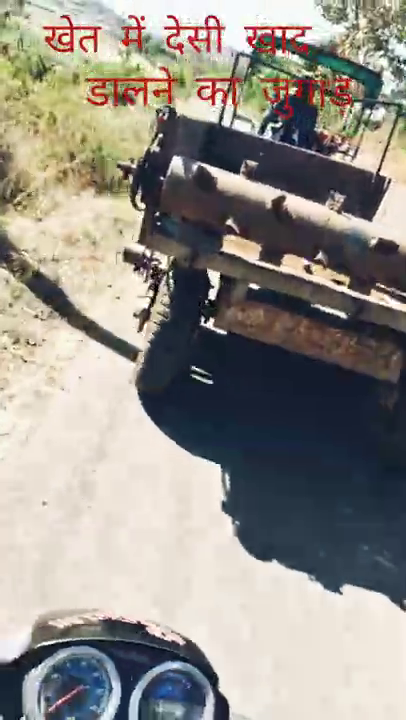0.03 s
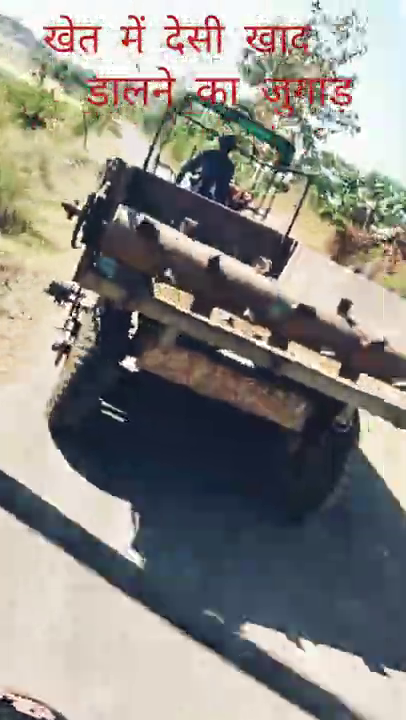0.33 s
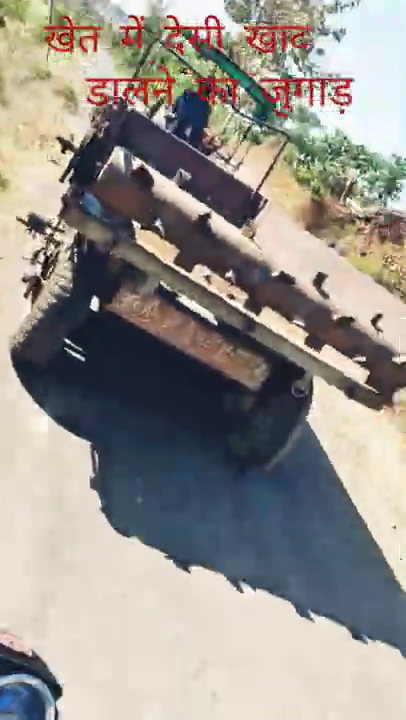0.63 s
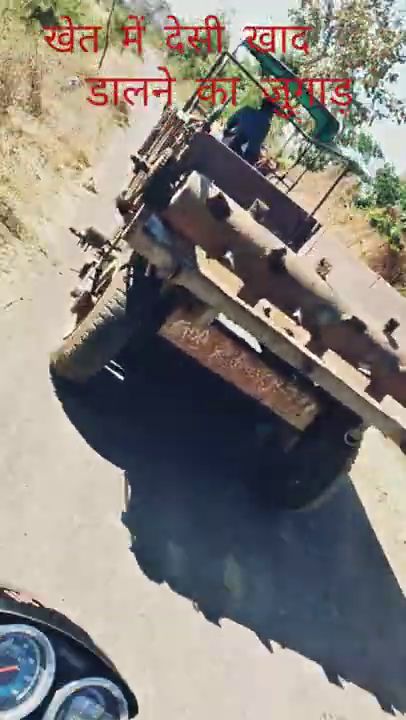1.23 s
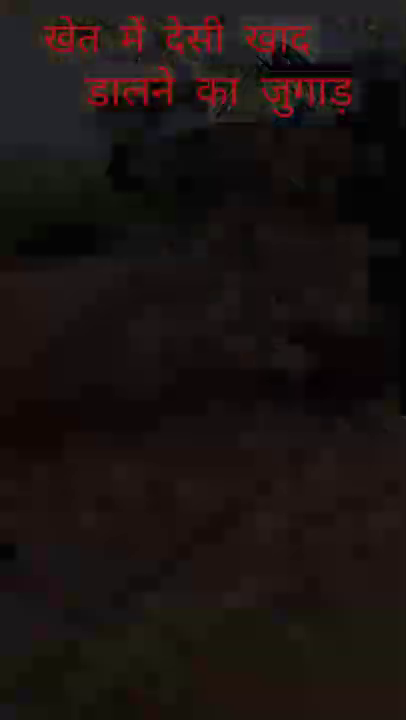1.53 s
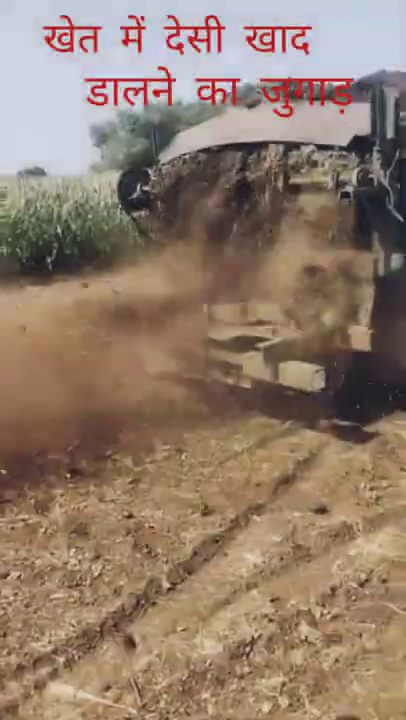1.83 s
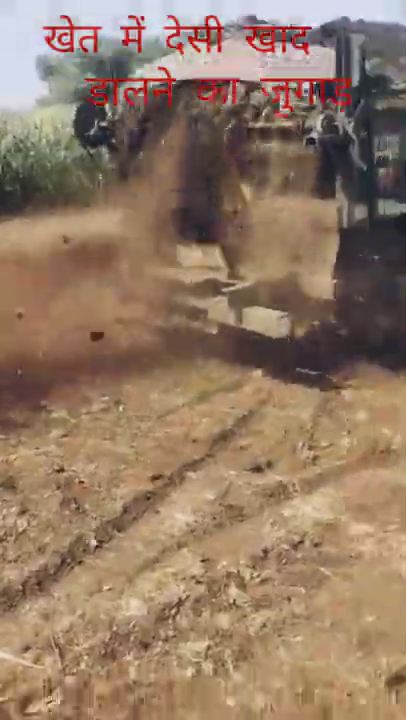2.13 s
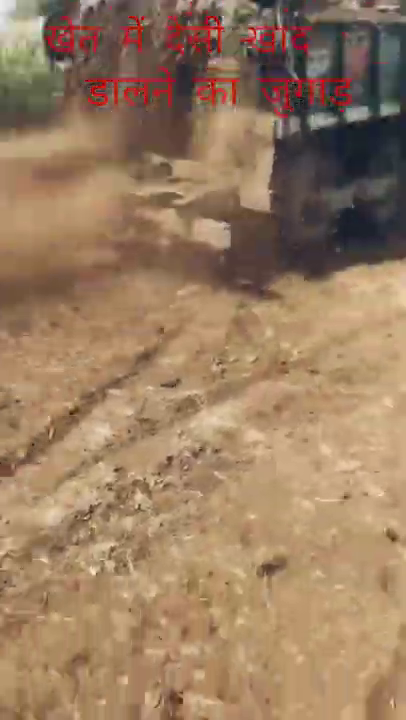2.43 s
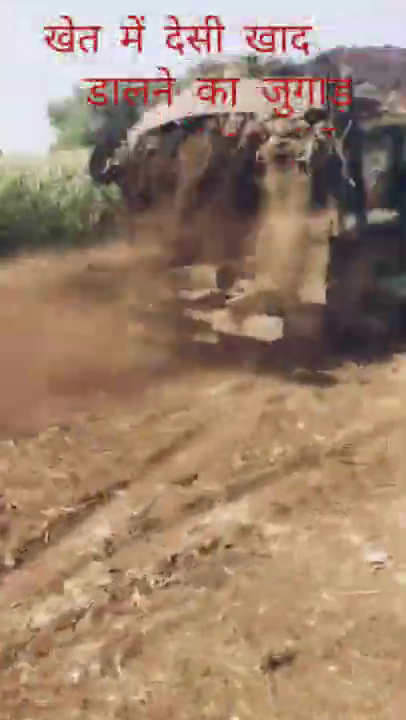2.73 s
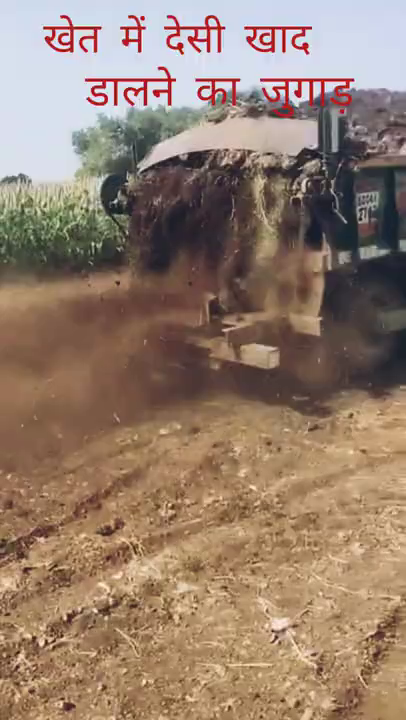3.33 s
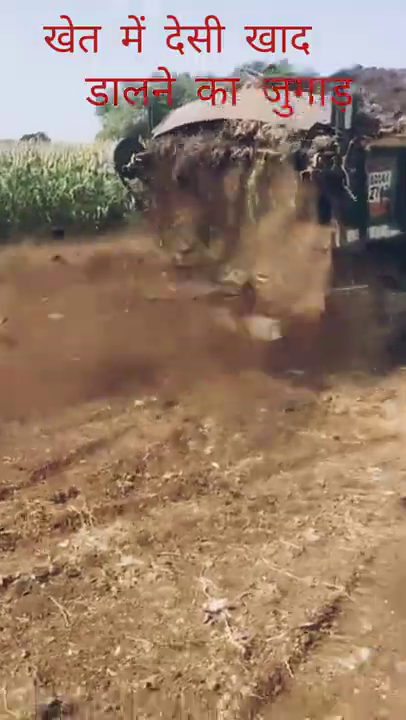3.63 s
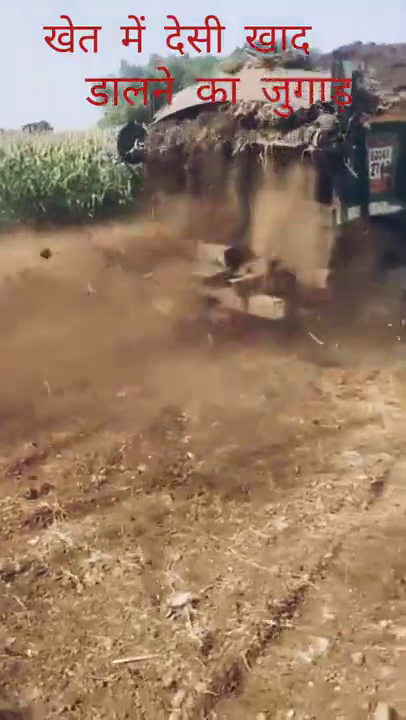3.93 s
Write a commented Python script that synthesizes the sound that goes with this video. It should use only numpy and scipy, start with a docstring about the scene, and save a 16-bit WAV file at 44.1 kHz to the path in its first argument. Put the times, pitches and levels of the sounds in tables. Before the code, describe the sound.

A manure spreader's clatter is the main sound. First, wind buffets the microphone over a motorcycle's engine beat and faint trailer rattles, fading out by 1.5 seconds. The spreader then fades in: dry clods thud and crunch irregularly on spinning steel discs, with hissing sprays of grit over a tractor's drone until 4 seconds. Stones ring against the steel at about 2.8 and 3.4 seconds.

```python
"""Wind buffets the microphone over an engine beat and faint rattles: a motorcycle follows a tractor's
manure spreader along a road. That fades out, and the spreader fades in at work in a field.
Clods drop on its spinning steel discs and burst, dry grit sprays out,
and a few stones ring the vanes over the drone of the tractor."""
import sys
import numpy as np
from scipy import signal
from scipy.fft import rfft, irfft
from scipy.io import wavfile

SR = 44100
rng = np.random.default_rng(int(sys.argv[2]) if len(sys.argv) > 2 else 0)


def generate_wav(sig):
    """Save sig (samples, or channels by samples) to the path in sys.argv[1] as 16-bit PCM at SR."""
    pcm = np.round(np.clip(np.atleast_2d(sig).T, -1, 1) * 32767).astype(np.int16)
    wavfile.write(sys.argv[1], SR, pcm)


N = 176400
T = np.arange(N) / SR


def amp(db):
    """Decibels to gain."""
    return 10 ** (np.asarray(db) / 20)

def unit(x):
    """Scales to rms 1."""
    return x / np.sqrt(np.mean(x ** 2) + 1e-20)

def curve(points):
    """Breakpoints to one value per sample."""
    return np.interp(T, *np.transpose(points))

def at_hz(points, hz):
    """Table lookup on a log-frequency axis."""
    f, value = np.transpose(points)
    return np.interp(np.log(hz + 1), np.log(f + 1), value)

def colour(x, spectrum, size=8192):
    """Minimum-phase filter; keeps the power of white noise."""
    log_gain = np.log(amp(at_hz(spectrum, abs(np.fft.fftfreq(size, 1 / SR)))))
    taps = np.fft.ifft(np.exp(np.conj(signal.hilbert(log_gain)))).real[:size // 2]
    return signal.oaconvolve(x, taps / np.linalg.norm(taps))[:N]

def resonate(x, hz, width_hz):
    """One complex resonance; its real part keeps the power of white noise."""
    r = np.exp(-np.pi * width_hz / SR)
    pole = r * np.exp(2j * np.pi * hz / SR)
    return signal.lfilter([np.sqrt(2 * (1 - r * r))], [1, -pole], x + 1e-18)

def wander(rate_hz):
    """Random drift of rms 1, up to about rate_hz."""
    hz = np.fft.rfftfreq(N, 1 / SR)
    return unit(irfft(rfft(rng.standard_normal(N)) * (hz > 2) / (1 + (hz / rate_hz) ** 4), N))

def grains(spread_db):
    """Dense stream of tiny, uneven impacts."""
    return unit(rng.standard_normal(N) * amp(spread_db * np.clip(wander(830), -2.5, 2.5)))

def bursts(rows, attack_s=0.0011, release_s=0.011):
    """Power sum of attack-hold-release envelopes."""
    power = np.zeros(N)
    for start_s, hold_s, db in rows:
        t = np.maximum(T - start_s, 0)
        release = np.exp(-np.maximum(t - hold_s, 0) / release_s)
        power += (amp(db) * np.minimum(t / attack_s, 1) * release) ** 2
    return np.sqrt(power)


# Left-right likeness: f/Hz, coherence/1
COHERENCE = [(60, 0.4), (200, 0.83), (1000, 0.17)]

def stereo_noise(spectrum):
    """Partly alike noise at two microphones."""
    same = at_hz(COHERENCE, np.fft.rfftfreq(N, 1 / SR))
    mid, side = rfft(rng.standard_normal((2, N))) * np.sqrt([(1 + same) / 2, (1 - same) / 2])
    return np.array([colour(irfft(mid + sign * side, N), spectrum) for sign in (1, -1)])

# Wind rumble: f/Hz, gain/dB
WIND_SPECTRUM = [(12, -40), (20, -1), (43, -3.5), (107, -3.5), (151, -1.5), (252, -10.5), (307, -13),
                 (600, -28), (780, -52), (1320, -120)]
# One stronger gust: t/s, level/dB
WIND_LEVEL = [(.96, -27.5), (1.0, -21.5), (1.11, -24.5), (1.15, -25.5)]

def wind(gust):
    """Gusts buffet the microphone."""
    return amp(curve(WIND_LEVEL)) * unit(stereo_noise(WIND_SPECTRUM) * amp(2.5 * gust))

# Road noise: f/Hz, gain/dB
ROAD_SPECTRUM = [(300, -13.5), (450, -2), (540, -7.5), (830, -3), (1450, -14.5), (2100, -13.5), (2900, -27),
                 (4200, -34), (6100, -37), (7100, -34), (8500, -42), (10500, -44), (13000, -62)]
FIRING_HZ = 21.66

def road(gust, level_db=-37.5, gust_db=2.4, jolt_db=1.5):
    """Road noise throbs with the engine, sways with gusts and shakes as the trailer jolts."""
    throb = 1 + 0.088 * np.cos(2 * np.pi * FIRING_HZ * T)
    noise = stereo_noise(ROAD_SPECTRUM) * throb
    return amp(level_db) * unit(noise * amp(gust_db * gust + jolt_db * wander(55)))

# Exhaust harmonics: f/FIRING_HZ, level/dB
EXHAUST_HARMONICS = [(2, -32.5), (4, -39), (7, -36.5), (14, -49.5), (18, -47)]

def exhaust(drift_db=1.7, drift_rad=0.98):
    """Harmonics of the firing rate, drifting in level and phase."""
    out = np.zeros(N)
    for order, db in EXHAUST_HARMONICS:
        gain = amp(drift_db * wander(7.1))
        phase = 2 * np.pi * order * FIRING_HZ * T + drift_rad * wander(6.1)
        out += amp(db) * unit(gain * np.sin(phase))
    return out

# Trailer rattles, ticks: t/s, hold/s, level/dB
RATTLES = [(.497, 0.0036, -40), (.548, 0.025, -39.5), (.607, 0.021, -38.5), (1.309, 0.006, -44)]
TICKS = [(.735, .002, -53.5), (.853, 0.0023, -50), (1.213, .002, -49.5), (1.326, .002, -50.5)]
# Their spectra: f/Hz, gain/dB
RATTLE_SPECTRUM = [(300, -32), (1000, 7), (2100, 4.5), (2900, -15), (4200, -19), (16000, -50)]
TICK_SPECTRUM = [(1000, -27), (3700, -2), (4200, 7), (4800, -9), (15000, -18)]

def trailer():
    """The trailer rattles faintly, with small sharp ticks."""
    rattles = colour(bursts(RATTLES) * grains(spread_db=4.5), RATTLE_SPECTRUM)
    return rattles + colour(bursts(TICKS) * rng.standard_normal(N), TICK_SPECTRUM)


# Tractor drone: f/Hz, gain/dB
DRONE_SPECTRUM = [(25, -34), (55, -24.5), (100, -7.5), (155, -5.5), (210, -2.5), (310, -3.5), (375, 0.5),
                  (500, -9), (610, -15.5), (770, 0), (930, -5), (1080, -4.5), (1350, -17.5), (2600, -45)]
# Its swell: t/s, level/dB
DRONE_LEVEL = [(1.55, -39), (1.9, -42.5), (2.25, -39.5), (3.1, -34.5), (3.6, -39.5), (4, -36)]

def tractor(lump_db=1.56):
    """Lumpy roar of the tractor and the spreader's drive."""
    roar = rng.standard_normal(N) * amp(lump_db * wander(30))
    return unit(colour(roar, DRONE_SPECTRUM)) * amp(curve(DRONE_LEVEL))

def housing(x, share=0.07, t60_s=0.11):
    """Close modes of the sheet-steel housing smear impacts into a short clatter."""
    t = np.arange(6000) / SR
    tail = signal.lfilter(*signal.butter(2, 5000, fs=SR), rng.standard_normal(len(t)))
    tail *= amp(-60 * t / t60_s)
    clatter = signal.oaconvolve(x, tail / np.linalg.norm(tail))[:N]
    return np.sqrt(1 - share) * x + np.sqrt(share) * clatter

def late_share(start_s=2.28, end_s=2.59):
    """Progress of the spray's shift in colour, 0-1."""
    return np.clip((T - start_s) / (end_s - start_s), 0, 1)

def shift_colour(x, early, late):
    """Equal-power crossfade between two spectra."""
    share = late_share()
    fading = colour(x * np.sqrt(1 - share), early)
    return fading + colour(x * np.sqrt(share) * rng.choice([-1, 1], N), late)

# Swish envelope: t/s, gain/1
SWISH_GAIN = [(2.15, 0.16), (2.2, 1.3), (2.3, 0.31), (2.42, 1.17), (2.62, 0.11)]
# Band centre: t/s, f/Hz
SWISH_PITCH = [(2.18, 4880), (2.36, 5790), (2.5, 4540)]

def swish(level_db=-37, width_hz=980):
    """Manure slides along a vane: a band of hiss rises and falls in pitch."""
    carrier = np.exp(2j * np.pi * np.cumsum(curve(SWISH_PITCH)) / SR)
    band = signal.lfilter(*signal.butter(2, width_hz / 2, fs=SR), grains(spread_db=2.5))
    return amp(level_db) * unit((band * carrier).real) * curve(SWISH_GAIN)

def clinks(drive, gain_db=-8, taps_per_s=300, t60_s=0.026, spread_db=7, spots=40):
    """Hard bits tap the steel; each spot rings with four partials of its own."""
    t, out = np.arange(3000) / SR, np.zeros(N)
    envelope = amp(-60 * t / t60_s) * (1 - np.exp(-t / 0.0012))
    for centre_hz in np.geomspace(2806, 9100, spots):
        partial_hz = centre_hz * rng.uniform(.65, 1.5, size=(4, 1))
        partials = np.sin(2 * np.pi * partial_hz * t).sum(axis=0)
        size = amp(spread_db * np.minimum(rng.exponential(1, N), 3))
        taps = size * (rng.random(N) < taps_per_s / spots / SR)
        out += signal.oaconvolve(taps, envelope * partials)[:N]
    return amp(gain_db) * unit(out) * drive

# Loud single grains: t/s, strength/dB
LOUD_SNAPS = [(1.9256, -23), (2.2374, -26), (2.5788, -17), (2.608, -17.5), (2.6749, -17.5), (3.1505, -20),
              (3.2125, -22), (3.4506, -25), (3.8497, -24), (3.925, -15)]

def snaps(flow, small_db=5.5, snaps_per_s=70, decay_s=0.0013):
    """Dry grains snap on the steel: a few loud ones among many small."""
    hits = flow * amp(small_db) * rng.random(N) ** 2
    hits *= rng.random(N) < snaps_per_s / SR
    for start_s, db in LOUD_SNAPS:
        hits[round(start_s * SR)] += amp(db)
    envelope = signal.lfilter([1], [1, -np.exp(-1 / (decay_s * SR))], hits + 1e-12)
    return np.gradient(envelope * rng.standard_normal(N))

# Crumb spectra: f/Hz, gain/dB
CRUMBS_EARLY = [(900, -21), (1400, -9), (2000, -1), (2550, -6.5), (3100, 4.5), (3650, -4), (4400, -9),
                (5130, -9.5), (5780, -25), (6900, -7), (10000, -13.5), (15500, -8)]
CRUMBS_LATE = [(1200, -22.5), (1900, 3.5), (2300, -9), (3700, 5.5), (5200, -8), (6600, -2), (8000, 3.5),
               (9700, -2.5), (15500, -1.5)]
# Treble shelf: t/s, gain/dB
CRUMB_TREBLE = [(1.7, -4), (1.95, 3.5), (2.3, 2.5), (2.58, 8), (2.92, 4.5), (3.04, -6), (3.45, 0.5),
                (4, -1)]

def crumbs(flow, clump_db=2.5, shelf_hz=6900):
    """Dry crumbs rain on the steel in clumps; the treble swells and dips."""
    patter = unit(grains(spread_db=1.5) * amp(clump_db * wander(78))) * flow
    clatter = housing(shift_colour(patter, CRUMBS_EARLY, CRUMBS_LATE))
    treble = signal.sosfiltfilt(signal.butter(2, shelf_hz, "high", fs=SR, output="sos"), clatter)
    return clatter + treble * (amp(curve(CRUMB_TREBLE)) - 1)

# Crumb flow: t/s, level/dB
CRUMB_FLOW = [(1.55, -37), (1.9, -33.5), (2.2, -35.5), (2.31, -39), (2.6, -37.5), (2.8, -38.5),
              (3.0, -30.5), (3.25, -31.5), (3.5, -32.5), (3.64, -34.5), (3.75, -30.5), (4, -31.5)]
# Grit sprays: t/s, hold/s, level/dB
SPRAYS = [(2.127, 0.0063, -31.5), (2.198, 0.041, -34.5), (2.402, .005, -29.5), (2.508, 0.0068, -32.5),
          (2.675, .035, -31.5), (2.81, 0.0056, -26.5), (2.87, 0.0073, -27.5), (2.888, 0.041, -32.5),
          (2.961, 0.0028, -23), (3.009, .008, -30), (3.2, 0.057, -32), (3.263, 0.011, -35),
          (3.383, 0.0046, -40), (3.53, 0.0048, -24.5), (3.73, 0.024, -32), (3.79, 0.042, -32),
          (3.859, 0.0066, -22.5), (3.9, .005, -26.5), (3.96, 0.013, -27)]
# Their spectrum: f/Hz, gain/dB
SPRAY_SPECTRUM = [(1500, -19), (3800, 2.5), (5200, -6), (6600, 5.5), (8200, 5.5), (9500, -1.5), (12500, -8),
                  (15500, -4.5)]

def grit():
    """The vanes fling sharp sprays over a steady rain of crumbs, with snaps and clinks."""
    flow, sprays = amp(curve(CRUMB_FLOW)), bursts(SPRAYS)
    rain = crumbs(flow)
    hiss = colour(sprays * grains(spread_db=4.0), SPRAY_SPECTRUM)
    return rain + hiss + snaps(flow) + clinks(np.hypot(flow * late_share(), sprays))

def ring(start_s, modes, pitch=1, flutter_db=3.5, flutter_hz=109):
    """Decaying modes of struck steel flutter as manure runs over it."""
    t, out = np.maximum(T - start_s, 0), np.zeros(N)
    for hz, db, t60_s in modes:
        sign = rng.choice([-1, 1])
        flutter = amp(flutter_db * np.tanh(wander(flutter_hz)))
        out += sign * flutter * amp(db - 60 * t / t60_s) * np.sin(2 * np.pi * hz * pitch * t)
    return out

# Small part's modes: f/Hz, gain/dB, t60/s
PING_MODES = [(4865, 1, 0.037), (12700, -11, 0.044)]

def ping(start_s=2.075, gain_db=-9.5, rise_s=0.0084):
    """A small steel part pings once."""
    return amp(gain_db) * ring(start_s, PING_MODES) * np.clip((T - start_s) / rise_s, 0, 1)

# Stone hits: t/s, ring/dB, pitch ratio/1, crack/dB
STONE_HITS = [(2.8105, -22.5, 1.074, -15), (2.8225, -32, 1.16, -36), (3.4256, -19.5, 1.012, -14),
              (3.962, -34, 1.005, -41)]
# Vane modes at ratio 1: f/Hz, gain/dB, t60/s
VANE_MODES = [(738, -5, 0.23), (866, -5, 0.045), (1787, -2.5, 0.13), (3040, -2.5, 0.047), (3370, 1, 0.033),
              (3670, -3.5, 0.043), (4500, -7.5, 0.045), (5180, -16, 0.12), (6530, -8.5, 0.075),
              (7500, -6, 0.051)]
# Impact crack: f/Hz, gain/dB
CRACK_SPECTRUM = [(200, -14), (900, 6), (4000, 1), (15000, -8)]

def stones(rise_s=0.0012, decay_s=0.0014):
    """Each stone cracks against a vane and leaves it ringing."""
    out = np.zeros(N)
    for start_s, ring_db, pitch, crack_db in STONE_HITS:
        t = np.maximum(T - start_s, 0)
        crack = amp(crack_db) * np.minimum(t / rise_s, 1) * np.exp(-t / decay_s) * rng.standard_normal(N)
        out += amp(ring_db) * ring(start_s, VANE_MODES, pitch)
        out += housing(colour(crack, CRACK_SPECTRUM))
    return out

def whine(scrape, gain_db=-39.5, sag_hz_per_s=28):
    """Rubbing keeps one disc sounding unsteadily; its pitch sinks a little."""
    hz = 1108.6 - sag_hz_per_s * (T - FIELD_FADE[0][0])
    carrier = np.exp(2j * np.pi * np.cumsum(hz) / SR)
    return amp(gain_db) * (carrier * resonate(scrape / carrier, hz=0, width_hz=20)).real

# Disc and housing modes: f/Hz, width/Hz, strike gain/dB, scrape gain/dB
DISC_MODES = [(378, 23, -12, -51), (787, 30, -21.5, -65), (1050, 35, -24.5, -58), (1126, 79, -18, -45.5),
              (1702, 30, -29, -49), (2300, 31, -18, -49), (3240, 100, -28, -47.5), (5110, 68, -23, -50.5)]
# Rubbing: t/s, level/dB
SCRAPE_LEVEL = [(1.55, 0), (2.45, -1.5), (3.0, -6.5), (4, -17)]

def discs(push, surge_db=4, surge_hz=16):
    """The steel discs ring under blows and surges of rubbing."""
    scrape = grains(spread_db=6.5) * amp(curve(SCRAPE_LEVEL) + surge_db * np.tanh(wander(surge_hz)))
    modes = sum(resonate(amp(hit_db) * push + amp(scrape_db) * scrape, hz, width_hz).real
                for hz, width_hz, hit_db, scrape_db in DISC_MODES)
    return modes + whine(scrape)

# Clod bursts: t/s, hold/s, thud/dB, crunch/dB
CLOD_HITS = [(1.678, 0.012, -33, -28), (1.77, 0.047, -40, -36.5), (1.887, 0.012, -35, -29),
             (1.9467, 0.013, -28, -26), (1.973, 0.011, -29, -27.5), (1.996, 0.0066, -24, -24),
             (2.016, .035, -33.5, -35), (2.063, 0.0055, -32, -30.5), (2.1267, 0.0048, -24.5, -20.5),
             (2.143, 0.048, -30, -33), (2.15, 0.007, -27, -27.5), (2.229, 0.0067, -34.5, -35.5),
             (2.255, 0.0043, -33, -36), (2.345, 0.016, -35.5, -35), (2.4, 0.0043, -36, -25),
             (2.415, 0.029, -25, -32.5), (2.638, 0.0077, -28.5, -34), (2.698, 0.017, -24.5, -31),
             (2.781, 0.02, -31, -41), (2.87, 0.016, -42, -38), (2.912, 0.024, -30.5, -35.5),
             (2.949, 0.02, -32, -34), (2.971, 0.0078, -22.5, -25), (3.003, 0.038, -28.5, -29.5),
             (3.094, 0.01, -29, -34), (3.124, 0.03, -36, -33), (3.1738, 0.006, -54, -21.5),
             (3.194, 0.021, -38.5, -27.5), (3.2625, 0.011, -23.5, -22.5), (3.534, 0.016, -42, -34.5),
             (3.788, 0.028, -29.5, -32), (3.816, 0.014, -23, -26), (3.8598, 0.0064, -32, -26),
             (3.897, 0.0088, -32, -30.5)]
# Their spectra: f/Hz, gain/dB
THUD_SPECTRUM = [(60, -29), (130, -12.5), (240, -4.5), (380, 1.5), (580, -12), (780, -5), (1080, 1.5),
                 (1400, -14), (2000, -11), (3000, -19.5), (8000, -80)]
CRUNCH_EARLY = [(600, -22), (1500, -13), (2300, 5), (2650, -0.5), (3250, 8.5), (3900, -5.5), (4400, -8.5),
                (5100, -4), (6000, -19), (15000, -40)]
CRUNCH_LATE = [(600, -37), (1500, -5), (2300, -7), (3000, 1), (3600, 1.5), (4400, 0.5), (5200, -17.5),
               (6600, -7.5), (8500, -24), (15000, -37)]

def clods():
    """Each clod breaks up as a cluster of impacts: thud, crunch and the ring of the discs."""
    impacts = grains(spread_db=2.5)
    push = impacts * bursts([(s, hold_s, db) for s, hold_s, db, _ in CLOD_HITS])
    crunch = impacts * bursts([(s, hold_s, db) for s, hold_s, _, db in CLOD_HITS])
    crunch *= rng.choice([-1, 1], N)  # decorrelates it from the thud
    return colour(push, THUD_SPECTRUM) + discs(push) + shift_colour(crunch, CRUNCH_EARLY, CRUNCH_LATE)


# Scene fades: t/s, gain/1
ROAD_FADE = [(0, 1), (1.1, 1), (1.24, 0.48), (1.35, 0.45), (1.45, 0.2), (1.54, 0)]
FIELD_FADE = [(1.535, 0), (1.6, 0.3), (1.75, 0.67), (1.95, 0.94)]

def scene():
    """The ride in stereo, then the field in mono."""
    field = clods() + grit() + swish() + ping() + stones() + tractor()
    gust = np.tanh(wander(rate_hz=27))
    ride = wind(gust) + road(gust) + exhaust() + trailer()
    return ride * curve(ROAD_FADE) + field * curve(FIELD_FADE)

def record(dry, cutoff_hz=15650):
    """Steep low-pass band limit."""
    taps = signal.firwin(511, cutoff_hz, window=("kaiser", 9), fs=SR)
    return signal.oaconvolve(dry, taps[None], "same")


dry = scene()
out = record(dry)
generate_wav(out)
```